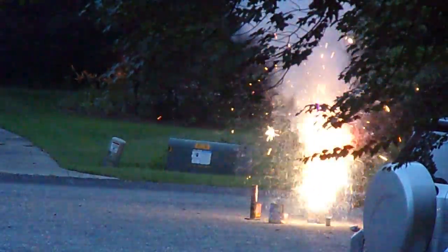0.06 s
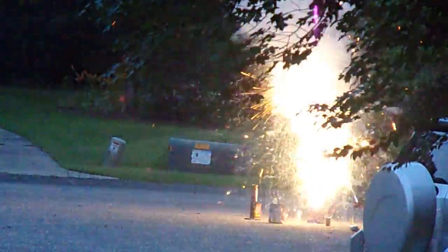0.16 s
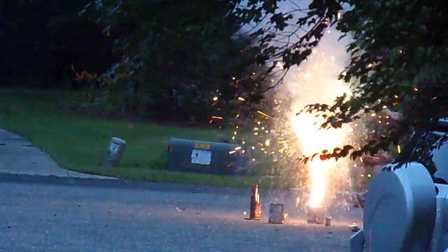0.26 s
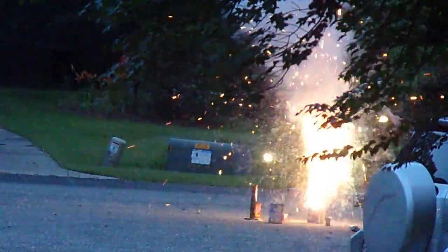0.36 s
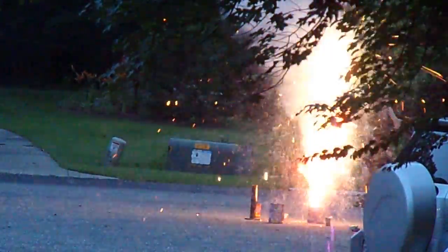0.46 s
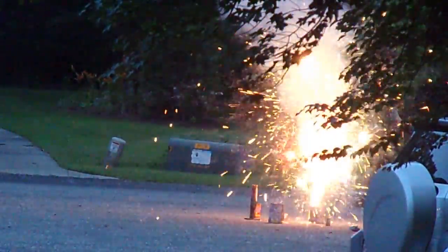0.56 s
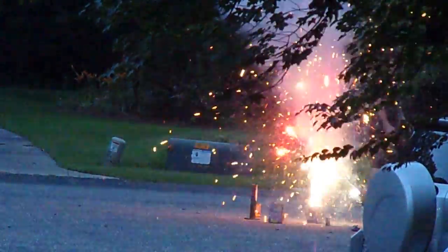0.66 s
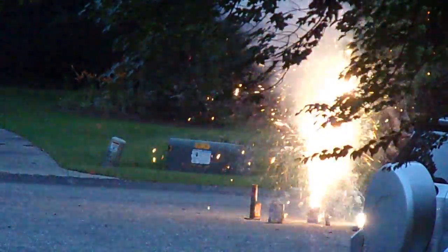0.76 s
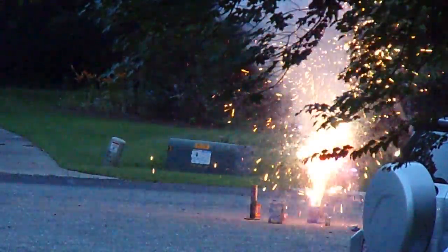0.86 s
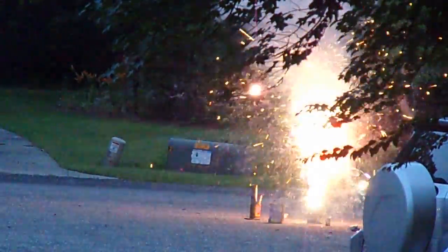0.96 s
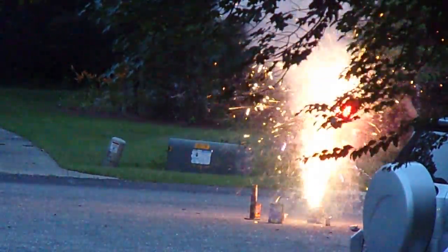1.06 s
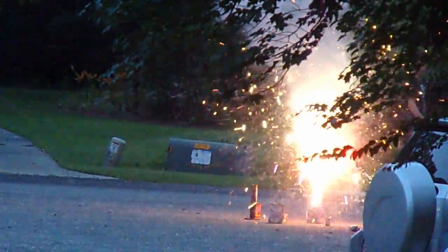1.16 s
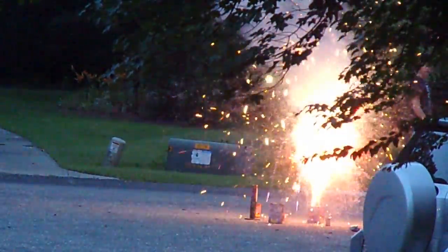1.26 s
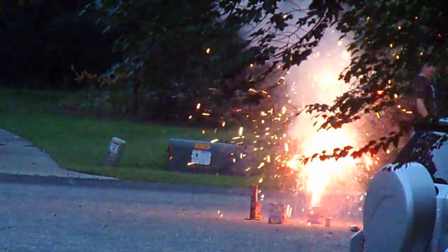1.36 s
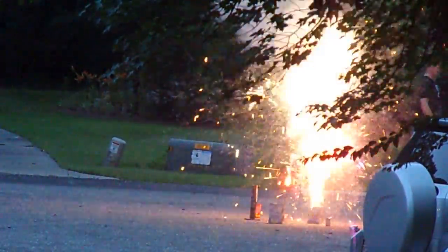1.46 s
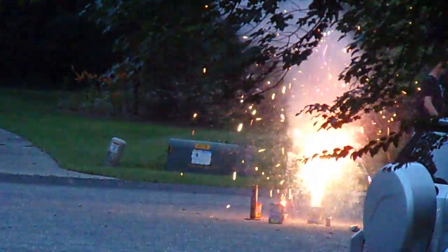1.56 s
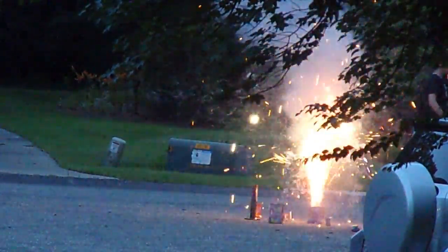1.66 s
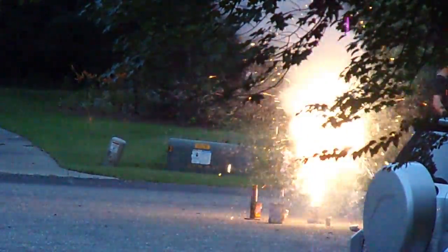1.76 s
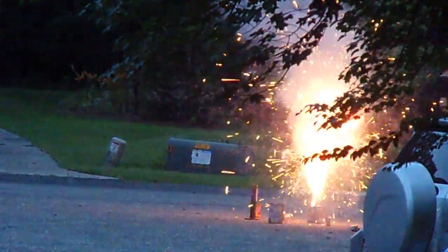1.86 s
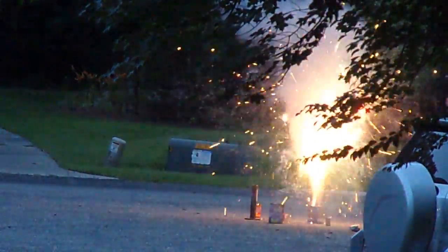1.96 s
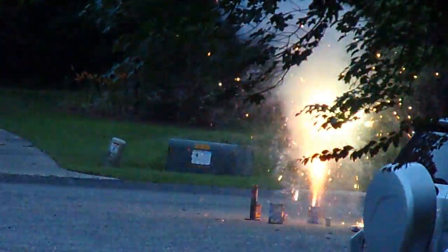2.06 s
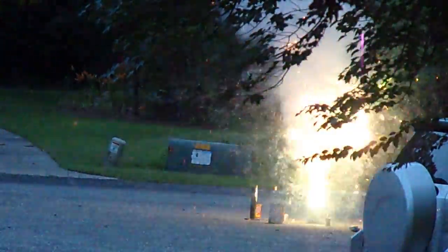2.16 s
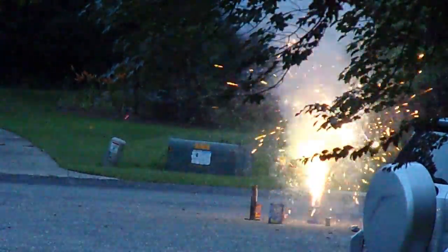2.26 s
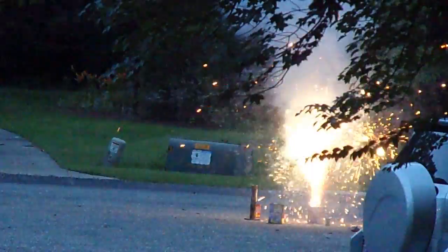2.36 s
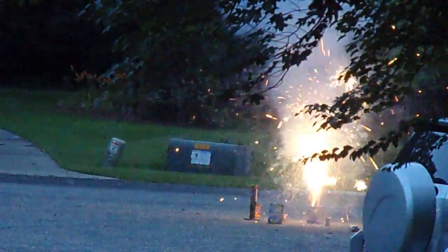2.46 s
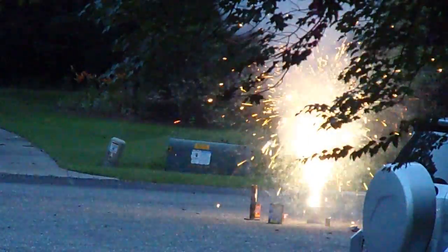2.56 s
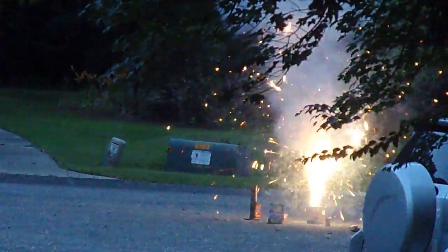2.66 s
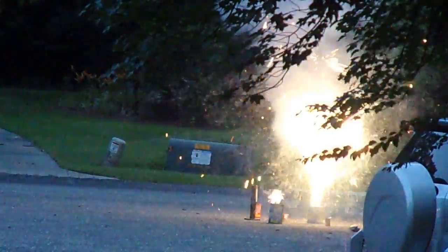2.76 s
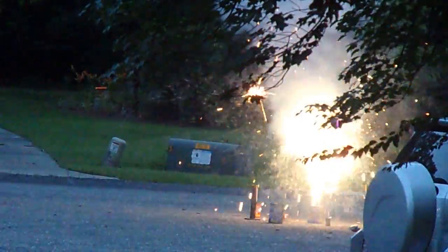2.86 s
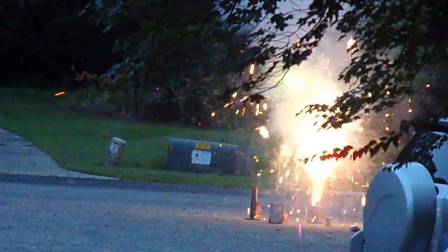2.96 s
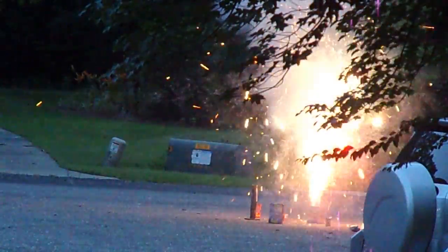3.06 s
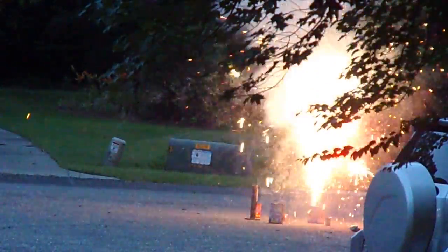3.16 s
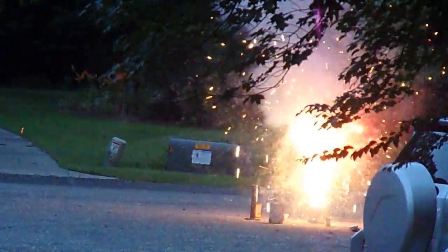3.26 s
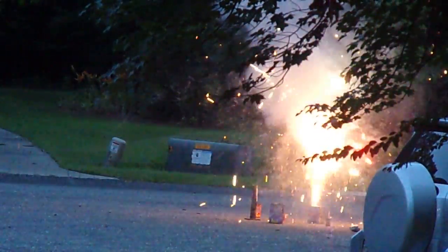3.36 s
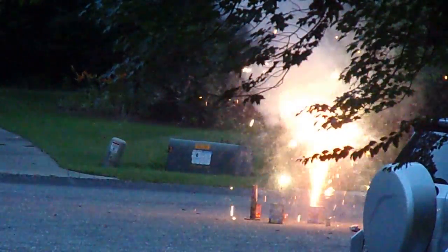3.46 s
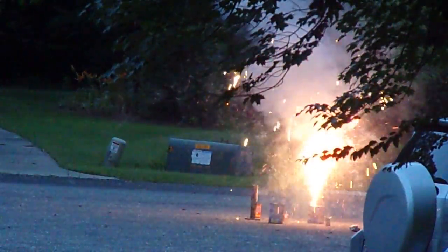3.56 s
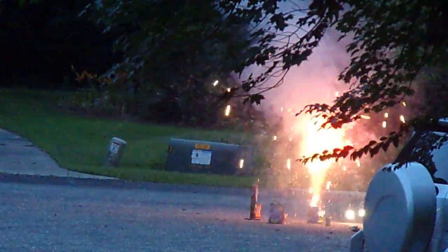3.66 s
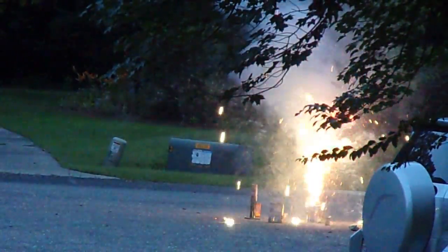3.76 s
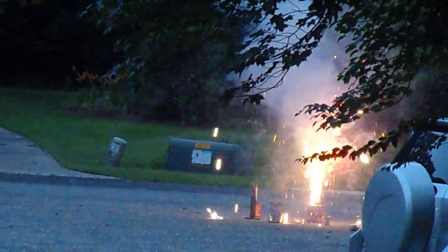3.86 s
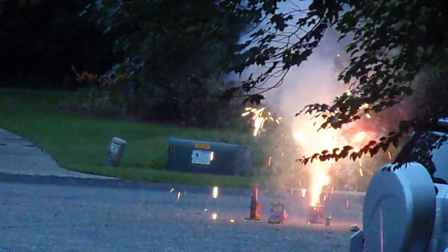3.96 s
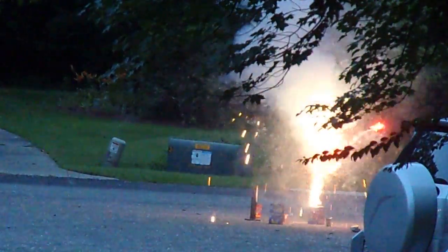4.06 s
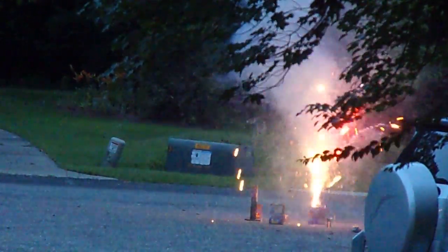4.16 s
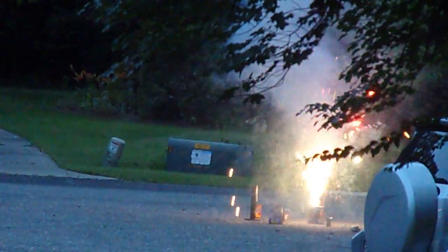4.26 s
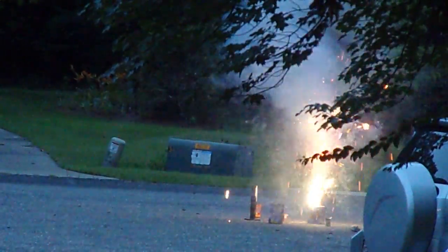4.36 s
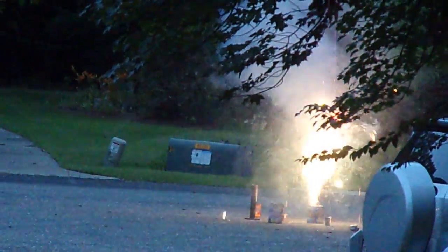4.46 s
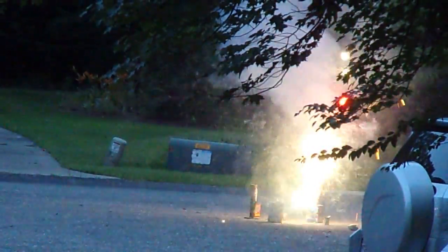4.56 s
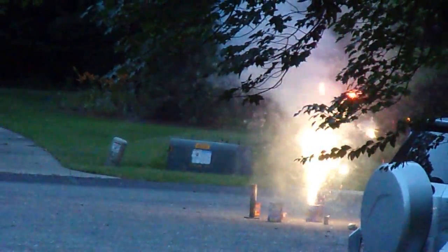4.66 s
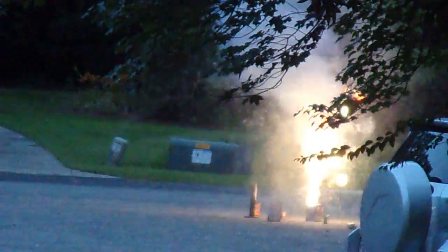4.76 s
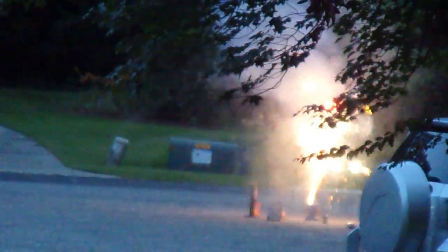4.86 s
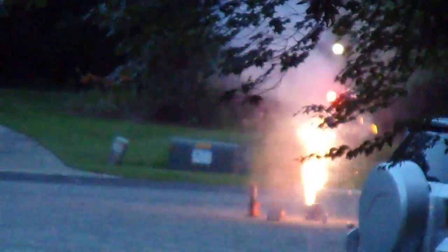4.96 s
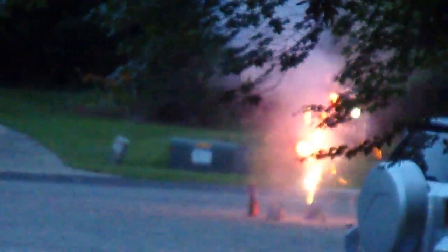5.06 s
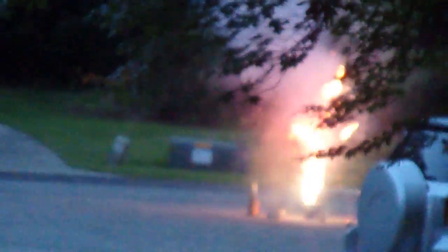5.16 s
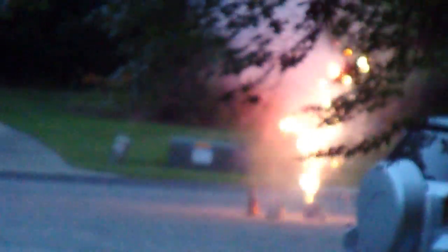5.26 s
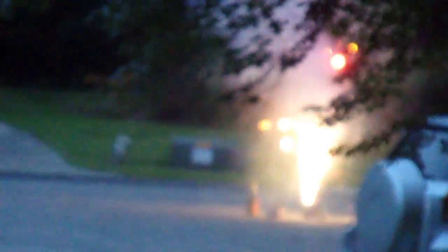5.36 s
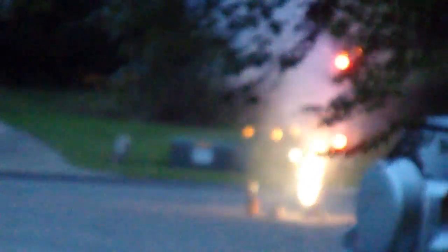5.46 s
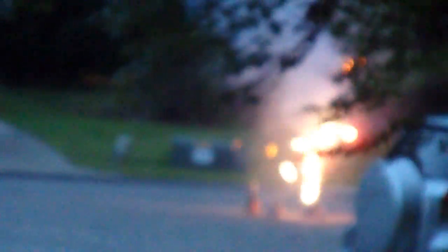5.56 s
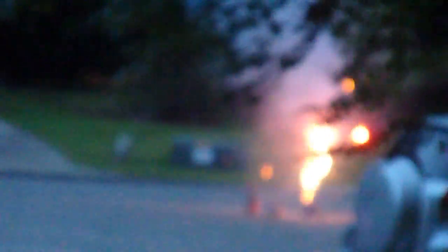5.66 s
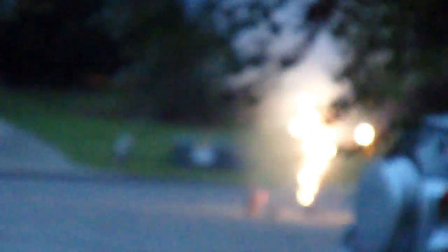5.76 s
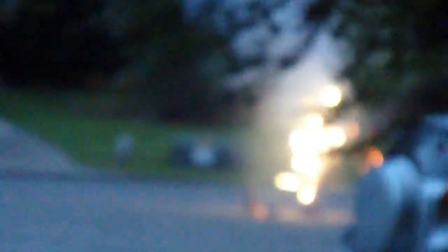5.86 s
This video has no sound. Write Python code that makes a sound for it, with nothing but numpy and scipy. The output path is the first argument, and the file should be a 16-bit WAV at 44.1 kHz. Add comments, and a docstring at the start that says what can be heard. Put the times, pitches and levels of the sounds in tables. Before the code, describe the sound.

From 0 to about 3.6 seconds a ground fountain firework crackles loudly and densely. Sharp, bright pops come irregularly, around thirty a second in clusters and fewer in brief gaps, some crisp and thin, others with more thump. Each is a split-second snap of several tiny shocks. Finer far sparks fizz between them, swelling and thinning, and trees and houses answer with a diffuse noisy wash. A thick burst comes around 0.8 to 0.95, a short lull near 2.3 to 2.5, and a last strong cluster near 3.4. By 4 seconds the pops have ended and the echoes decay. What remains to nearly 6 seconds is far quieter: a soft steady jet hiss, a wavering low hum, rumble and intermittent drone, with high insects pulsing rapidly in short phrases about four times a second. Very faint thin tones appear after 5. The mono camera sound softly clips the loudest pops.

```python
"""Crackling fountain firework

A ground fountain firework on a street at dusk: crackling stars burst in sharp pops, each a few quick shocks,
and small sparks crackle further off. Trees and houses answer with a wash of noisy echoes.
Then mostly the jet's hiss (shaped noise), the hum of its tube (wavering tones), a low rumble and drone, and
chirring insects (pulsing narrow noise) remain, with a few faint tones.
The camera smears each pop into a short falling chirp and rounds off the loudest peaks."""
import sys
import numpy as np
from scipy import signal
from scipy.fft import rfft, irfft, next_fast_len
from scipy.io import wavfile
from scipy.ndimage import map_coordinates

SR = 44100
rng = np.random.default_rng(int(sys.argv[2]) if len(sys.argv) > 2 else 0)


def put_to_file(sound):
    """Save the sound as 16-bit audio at rate SR, in the file named by the first command-line argument."""
    columns = np.atleast_2d(sound).T  # one column per channel
    safe = np.clip(columns, -1, 1)
    whole_steps = np.round(safe * 32767)
    wavfile.write(sys.argv[1], SR, whole_steps.astype(np.int16))


N = 260631


def pops():
    """Each star bursts in a few quick shocks, whose overlap colours it; treble and body vary with its place."""
    # Bursting stars, against an average star; treble and body are relative to the star's strength:
    # (time [s], strength [dB], treble [dB], body [dB])
    stars = [(0.0139, 3, -10, -12.5), (0.0379, -14, -12, 0), (0.0442, 1.5, -22, -8.0),
             (0.0839, 3.5, -12, -27), (0.112, -1, -9, -14), (0.1153, -7, -12, -5), (0.1227, -5.5, -7, -14),
             (0.1856, -3.5, -3.5, -24), (0.233, -9, -4, -16), (0.2377, 2.5, -12, -15), (0.242, -9, -9, -7),
             (0.3507, 5, -13, -21), (0.4202, 1, -11.5, -13.5), (0.4996, -3.5, -3.5, -9.5),
             (0.5125, 3, -16, -17), (0.5162, -12, -13, -9), (0.5225, -15, 1, -10), (0.6079, -3, -6.5, -18),
             (0.6364, -0.5, -12.5, -6.5), (0.7848, -1.5, -9.5, -10.5), (0.8166, 1, -10, -8.5),
             (0.8212, 1, -11, -10), (0.8293, -1.5, -5, -18), (0.8323, -6.0, -4, -13),
             (0.8394, -11, -14, -14), (0.8422, -9, 0, -18), (0.8474, -7, -9.0, -18),
             (0.8501, -16, -11.0, -9), (0.8554, 0.5, -9.5, -17), (0.883, 1.5, -21, -25),
             (0.8883, -1.5, -4.5, -18), (0.8916, -12, 2, -22), (0.9038, 0.5, -10, -33),
             (0.9402, -10, -12, -22), (0.9451, -3.5, 0.5, -4.5), (0.9498, -14, -9, -16),
             (1.0206, -10, -19, -10), (1.0452, -3.5, -14, -14), (1.1001, -2.5, -10, -11),
             (1.1034, -3, -10, -16), (1.1057, -12, -9, -14), (1.1291, -1.5, -7, -11.0), (1.147, -3, -7, -4),
             (1.1536, -3.5, -13.0, -9), (1.157, 0.5, -10.5, -11), (1.2326, 2, -6.5, -29),
             (1.2635, -13, -7, 1), (1.2935, -9.5, -2.5, -10), (1.3806, -2.5, -6, -18),
             (1.4, -7.0, -9.0, -21), (1.4371, -3.5, -9, -17), (1.4407, -6.5, -6.5, -10),
             (1.5086, -12, 6.5, -15), (1.5303, -1, -14, -9), (1.5376, -5.5, -13.0, -0.5),
             (1.542, 2, -12, -15), (1.6193, -0.5, -11, -16.0), (1.6239, -6, -9, -11),
             (1.6468, 1, -10.5, -10.5), (1.6536, -9, -14.0, -5), (1.7348, -3.5, -7.5, -11.5),
             (1.7874, -2.5, -4, -7), (1.7906, -6, -15, -7), (1.7997, -3, -19, -15),
             (1.8162, 1.5, -13, -9.5), (1.8344, -3.5, -6.5, -4), (1.9171, -7.5, -1, -11),
             (1.9223, -15, -9, -16), (1.9753, -10, -4, -9), (2.0381, -1, -13, -29),
             (2.065, 2.5, -33, -13.5), (2.0816, -9, 4, -27), (2.1078, 0.5, -9.5, -9.5),
             (2.1162, -2, -10, -17), (2.1339, -0.5, -12, -13), (2.1641, 0, -4.5, -12),
             (2.168, -5.5, -8, -9.0), (2.181, -1, -5, -11), (2.1928, -8.5, 2, -2), (2.2559, 1.5, -7.5, -12),
             (2.2717, 0.5, -8.5, -22), (2.285, -3, -8.0, -22), (2.519, -0.5, -8.5, -14.5),
             (2.5371, -1.5, -2.5, -8.5), (2.5455, -4, -10, -6), (2.559, -2, -6.5, -9),
             (2.6659, -3.0, -2, -13), (2.6686, -15.5, -9, -6), (2.6914, -3, -12, -4.5),
             (2.6937, -11, -18, -8), (2.7713, -6.5, -2, -8), (2.8357, 0, -6.5, -11.5),
             (2.861, -3, -6.5, -17), (2.8651, -5, 3, -8), (2.8724, 1, -16, -8), (2.8865, 2.5, -8, -16),
             (2.957, -12, -3, -17), (2.986, -5, -2.5, -12.0), (3.0393, -14.5, -23, 3.5),
             (3.048, -14, -20, -7), (3.1075, 0.5, -12, -21), (3.1266, 0, -6.5, -10.5),
             (3.2248, -6, -3, -7.5), (3.2508, -1.5, -4, -6), (3.2919, -4.5, -25, -4),
             (3.3353, -0.0, -16, -27), (3.3713, 3.5, -17, -9.5), (3.374, -3, -20, -30),
             (3.3926, -8, -0.5, -21), (3.396, -8, -16, -7), (3.423, -4.5, -5, -21), (3.4316, 4, -9.5, -14),
             (3.4355, 2.5, -18, -11), (3.516, 1, -2.5, -5.5), (3.5196, -6, -4, -10),
             (3.524, -13, -5.0, -10), (3.565, 1.5, -8.5, -36), (3.6117, -2, -10.5, -14),
             (3.7297, -17, -15, -8), (3.9266, -25, -4, -10.0), (4.348, -37, 2, -14), (4.406, -37, -10, -18),
             (5.716, -36, -7, -15)]
    s, strength_db, treble_db, body_db = np.transpose(stars)
    luck = rng.random((len(s), 2, 6))
    # longest delays [s]: burst, close fragment, bounce off the road, three splinters
    late = luck[:, 0] * [0.0002, 0.0012, 0.003, 0.000084, 0.0061, 0.0038]
    sizes = np.c_[np.ones(len(s)), 0.5 + luck[:, 1, 1:]]  # only the followers vary
    at = np.round((s[:, None] + late) * SR).astype(int).ravel()

    def train(level_db, shares):
        """Clicks at the moments of the shocks."""
        heights = shares * sizes * amp(level_db)[:, None]
        return np.bincount(at, heights.ravel(), N)

    def high(hz):
        """Keeps the treble."""
        return 1 / (1 + (7200 / (hz + 1)) ** 6)

    def low(hz):
        """Keeps the body."""
        return 1 / (1 + (hz / 2200) ** 4)

    # share of each of the six shocks; the last three, the splinters, count most in the treble
    shock = [1, 0.4, 0.51, 0.1, 0, 0.12]
    treble_shock = [1, 1.0, 0.39, 0.77, 0.69, 0.53]
    crack = filtered(train(strength_db + 10.5, shock), lambda hz: 1 - high(hz) - low(hz))
    treble = filtered(train(strength_db + treble_db + 15, treble_shock), high)
    body = filtered(train(strength_db + body_db + 18.5, shock), low)
    return crack + treble + body


def sparks():
    """Hundreds of small far shocks a second, in clumps and of mixed sizes; distance dulls their treble."""
    # Loudness of the swarm before the crackle's colour: (time [s], level [dB])
    swarm = [(0.0, -24.5), (0.55, -38), (0.95, -29), (1.37, -35), (1.55, -29), (2.2, -32), (2.75, -37),
             (3.45, -29.5), (3.78, -39.5), (3.97, -52), (4.1, -55)]
    far_hz = 7050  # duller above this
    fires = rng.random(N) < 400 * amp(3 * wobble(40)) / SR
    sizes = amp(10 * rng.random(N))  # spread over 10 dB
    dulled = unit(filtered(fires * sizes, lambda hz: 1 / np.sqrt(1 + (hz / far_hz) ** 2)))
    heard = np.arange(N) < swarm[-1][0] * SR  # silent after the last row
    return dulled * amp(curves(swarm)[0]) * heard


def street(shocks):
    """Scattered echoes: each shock feeds a noisy tail that builds, then dies at its own speed per band."""
    # Echoes off trees and houses: (frequency [Hz], time to fall 60 dB [s], level [dB])
    echoes = [(290, 1.1, 3.5), (965, 1.04, 0), (2750, 1.11, 1.5), (4160, 0.84, -0.5), (5340, 0.63, -7),
              (6100, 0.69, -1.5), (15100, 0.57, -0.5)]
    hop = 128  # samples per time step
    hz, _, z = signal.stft(rng.standard_normal(N + SR // 10), SR, nperseg=2 * hop)
    energy = np.bincount(np.arange(N) // hop, shocks ** 2, z.shape[1])
    before = 128  # time steps ahead of the start: stars that burst then still echo
    energy = np.r_[np.full(before, amp(-4) ** 2), energy]
    t = np.arange(2 * SR // hop) * hop / SR
    # 120 in amp() is a 60 dB fall, because the tail is energy
    tail = (1 - np.exp(-t / 0.0037)) * amp(-120 * t / along(echoes, hz)[:, None])
    tail = tail / tail.sum(1, keepdims=True) / hop
    power = np.abs(signal.fftconvolve(energy[None], tail, axes=1)[:, before:before + z.shape[1]])
    gain = amp(along(echoes, hz, order=2))[:, None] * np.sqrt(power)
    wash = signal.istft(z * gain, SR, nperseg=2 * hop)[1][:N]
    # single trunks and walls stand out of the wash
    lumps = amp(0.8 * wobble(40) + 1.8 * wobble(220))
    return unit(lumps) * wash


def jet():
    """Burning gas hisses at the nozzle, hums unsteadily in the tube and rumbles."""
    # Colour of the hiss, then of the rumble: (frequency [Hz], level per Hz [dB])
    hiss_colour = [(120, -34), (220, -1), (480, -9), (720, -6.5), (900, -9.5), (1400, -13), (2900, -5),
                   (3500, -11.5), (4300, -9.5), (5900, -20), (9900, -20), (13000, -20), (14400, -35),
                   (15700, -36), (16100, -70)]
    rumble_colour = [(20, -22), (42, -6), (65, -5), (98, 4), (130, 3), (200, -0.5), (290, -36)]
    # Loudness of the hiss, the rumble and the hums together: (time [s], level [dB])
    hiss_level = [(3.9, -39), (4.15, -42), (4.8, -44.5), (5.91, -45)]
    rumble_level = [(0, -41.5), (3.6, -40), (3.9, -47), (4.85, -45.5), (5.0, -56), (5.2, -47), (5.91, -50)]
    hum_level = [(0, -42), (.3, -40.5), (1.04, -40.5), (1.3, -50), (1.63, -35), (1.72, -50), (1.83, -34),
                 (2.05, -46), (2.2, -37), (2.3, -44), (3.3, -40), (3.8, -47), (4.1, -46.5), (4.5, -40.5),
                 (4.86, -44), (4.92, -54), (5.05, -53), (5.2, -48.5), (5.91, -49)]
    # The burning tube's hums, relative to the loudness above: (pitch [Hz], waver [Hz], level [dB])
    tube_hums = [(145, 4.04, -2.5), (171.7, 5.01, -3.5)]

    # each hum swells and sinks unevenly, by about 4 dB
    hum = sum(amp(db + 4 * wobble(10)) * tone(hz, waver, 14) for hz, waver, db in tube_hums)
    hum = np.sqrt(2) * amp(curves(hum_level)[0]) * hum
    rumble = noise(lambda hz: amp(along(rumble_colour, hz)))
    rumble = rumble * amp(curves(rumble_level)[0] + 2 * wobble(8.9))
    hiss = noise(lambda hz: amp(along(hiss_colour, hz)))
    hiss = hiss * amp(curves(hiss_level)[0] + 0.28 * wobble(70))
    return hum + rumble + hiss


def drone():
    """A low drone of wandering pitch and unsteady level that comes in spells."""
    # Spells, before the unsteady level: (start [s], end [s], pitch [Hz], level [dB])
    drones = [(-.1, 0.077, 56, -38), (2.3, 2.68, 54, -44), (2.75, 2.95, 56, -43), (3.08, 3.24, 56, -45),
              (3.45, 3.57, 52, -45), (3.7, 3.85, 64, -44), (4.02, 4.12, 60, -44), (5.12, 5.35, 66.6, -51),
              (5.3, 5.6, 58, -53), (5.55, 6, 53, -51)]
    waver_hz, swell_s = 3.1, 0.062
    spells = sum(amp(db) * swell(a, b, swell_s) * tone(hz, waver_hz, 11) for a, b, hz, db in drones)
    return np.sqrt(2) * amp(2 * wobble(22)) * spells


def insects():
    """A chorus of wing scrapes in one narrow band, pulsing about forty times a second, in phrases."""
    # Phrases of the chorus, level before rise and sag: (start [s], length [s], level [dB])
    chirrs = [(3.98, .19, -57), (4.23, 0.15, -54), (4.46, .17, -61), (4.754, .14, -56), (5.005, 0.18, -56),
              (5.27, 0.21, -57), (5.58, .2, -55), (5.87, .2, -54)]
    rise_s, fade_db_per_s = 0.034, 29  # each phrase rises quickly, then sags
    chorus_db = -52.5  # the steady chorus under the phrases
    pulse = tone(41, 5.7, 3.6)
    band = noise(lambda hz: resonance(hz, 6760, 290) ** 2)
    t = np.arange(N) / SR
    phrases = sum(amp(db - fade_db_per_s * np.abs(t - s)) * swell(s, s + length, rise_s)
                  for s, length, db in chirrs)
    return (amp(chorus_db) + phrases) * unit(band * amp(2.4 * pulse))


def faint_tones():
    """A few thin sines of wandering pitch come and go in the quiet."""
    # Thin tones: (start [s], end [s], pitch [Hz], peak level [dB])
    faint = [(4.95, 5.91, 284, -59), (4.95, 5.35, 595, -58), (5.25, 5.6, 554, -60), (5.3, 5.91, 730, -61.5)]
    return sum(amp(db) * swell(a, b, 0.08) * tone(hz, 3, 5.2) for a, b, hz, db in faint)


def amp(db):
    """Gain of a level in dB."""
    return 10 ** (np.asarray(db) / 20)


def unit(x):
    """x scaled to an average strength (rms) of 1."""
    return x / np.sqrt(np.mean(x ** 2) + 1e-20)


def along(points, hz, order=1):
    """Reads one column of (frequency, value, ..) rows at hz, on a log frequency axis."""
    table = np.transpose(points)
    return np.interp(np.log(hz + 1), np.log(table[0] + 1), table[order])


def curves(rows):
    """One value per sample for each column after the time."""
    s, *cols = np.transpose(rows)
    return [np.interp(np.arange(N) / SR, s, c) for c in cols]


def wobble(rate):
    """A smooth random curve through rate random points a second."""
    knots = rng.standard_normal(int(N * rate / SR) + 4)
    return map_coordinates(knots, [np.arange(N) * rate / SR])


def swell(start, end, rise):
    """0 to 1 and back over a spell."""
    t = np.arange(N) / SR
    return np.clip(np.minimum(t - start, end - t) / rise, 0, 1)


def tone(hz, waver_hz, rate):
    """A sine whose pitch wanders."""
    return np.sin(2 * np.pi * np.cumsum(hz + waver_hz * wobble(rate)) / SR)


def filtered(x, response):
    """x with each frequency scaled and delayed by a complex response."""
    m = next_fast_len(N + SR // 2)
    return irfft(rfft(x, m) * response(np.fft.rfftfreq(m, 1 / SR)), m)[..., :N]


def noise(response):
    """Coloured noise of rms 1."""
    return unit(filtered(rng.standard_normal(N), response))


def resonance(f, hz, width):
    """One resonance, gain 1 at its centre."""
    return 1j * f * width / (hz * hz - f * f + 1j * f * width)


def scene():
    """The crackle with its echoes, over jet, drone, insects and faint tones."""
    # Colour of a pop at the camera, before an even lift: (frequency [Hz], level per Hz [dB])
    blast = [(130, -18), (220, -9.5), (341, -6.5), (492, -14.5), (697, -2), (837, -6), (1180, -3.5),
             (4420, 2), (6620, -4), (7380, -12), (9200, -6.5), (10600, -13.5), (13300, -12), (15900, -25),
             (17400, -53)]
    shocks = pops() + sparks()
    echoed = shocks + amp(-1.5) * street(shocks)
    crackle = filtered(echoed, lambda hz: amp(along(blast, hz) + 6.5))
    return (crackle + jet() + drone() + insects() + faint_tones())[None]


def record(dry):
    """The camera delays low tones more than high ones, cuts lows and notches, clips softly and limits the band."""
    # How late each frequency passes: (frequency [Hz], delay [ms])
    lag = [(200, 5.46), (650, 4.75), (950, 4.6), (1300, 2.41), (2250, 1.85), (3600, 0.83), (6000, 0.51),
           (12000, 0.045)]
    # Narrow dips: (centre [Hz], width [Hz], depth [0-1])
    notches = [(2758, 74, 1), (3330, 69, 1), (7430, 43, 0.8), (10650, 570, 1), (13900, 700, 0.8)]
    top_hz, ceiling = 17600, 0.91

    def camera(hz):
        """Delay, low cut and notches together."""
        # adding up the delays over frequency gives the phase
        turn = np.exp(-2j * np.pi * np.cumsum(along(lag, hz) / 1000) * hz[1])
        low_cut = 1 / (1 + (32 / (hz + 1)) ** 2)
        dips = [1 - np.clip(depth, 0, 1) * resonance(hz + 1e-9, centre, width)
                for centre, width, depth in notches]
        return turn * low_cut * np.prod(dips, axis=0)

    x = filtered(dry, camera)
    x = x / (1 + np.abs(x / ceiling) ** 6) ** (1 / 6)  # soft clipping
    return filtered(x, lambda hz: hz < top_hz)


dry = scene()
out = record(dry)
put_to_file(out)
```